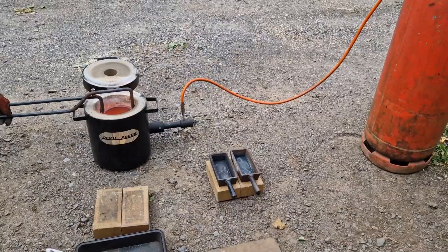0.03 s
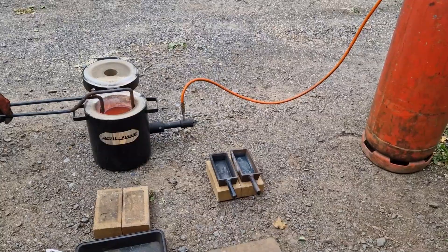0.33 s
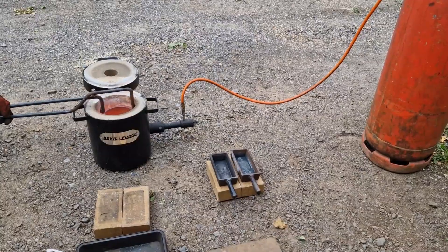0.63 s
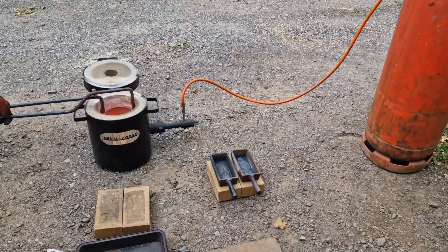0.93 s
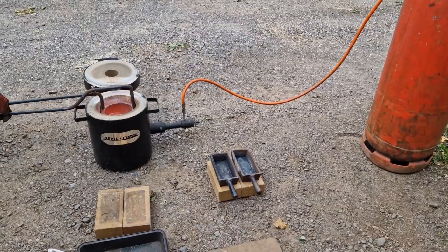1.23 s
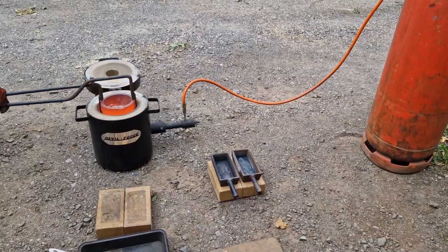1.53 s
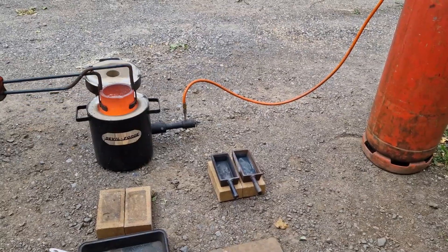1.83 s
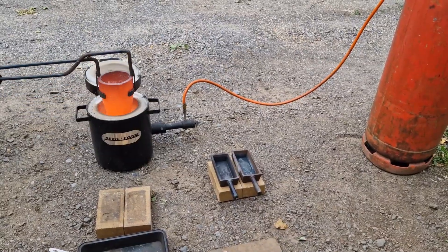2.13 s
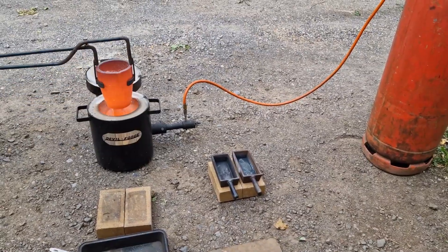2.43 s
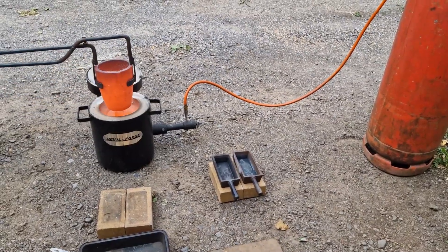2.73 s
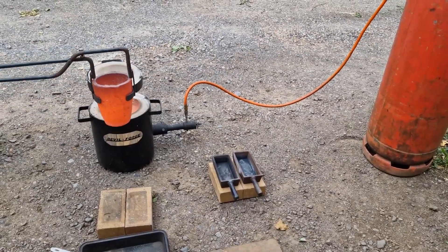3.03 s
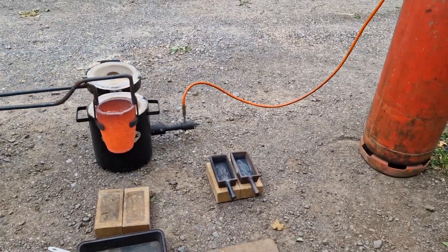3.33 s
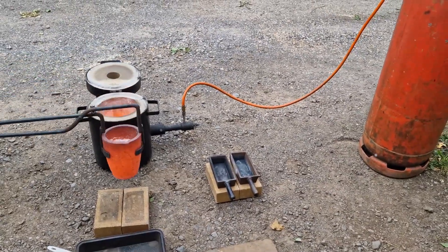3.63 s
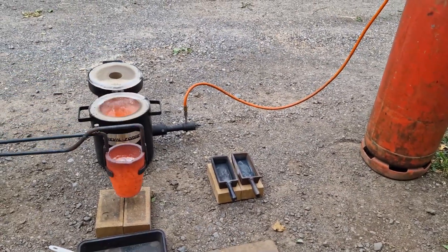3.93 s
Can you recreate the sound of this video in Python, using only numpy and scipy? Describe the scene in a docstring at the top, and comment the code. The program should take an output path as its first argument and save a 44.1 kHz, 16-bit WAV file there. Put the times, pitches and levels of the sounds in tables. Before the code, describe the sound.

A small gas furnace roars low and steady outdoors for all four seconds, with a faint gas hiss slightly to the right. From about 1.3 seconds, as a crucible is lifted through the mouth, the roar dips a little and gains a hollow, breathy resonance, strongest near 1.8 seconds. That resonance edges up in pitch until about 2.5 seconds, then lingers more softly as the roar continues.

```python
"""A low flame roar, with the hiss of a gas jet beside it, comes from a small propane melting furnace.
Turbulent combustion sounds through the furnace mouth, whose resonances change as a glowing crucible,
lifted out with tongs, rises, chokes the mouth and comes clear. The jet's noise rings in the burner tube.
Reflections from the gravel yard interfere, cancelling different pitches at the two microphones."""
import sys
import numpy as np
from scipy import signal
from scipy.fft import rfft, irfft
from scipy.io import wavfile
from scipy.ndimage import uniform_filter1d

SR = 44100
rng = np.random.default_rng(int(sys.argv[2]) if len(sys.argv) > 2 else 0)


def inscribe(sig):
    """Save sig as 16-bit PCM at rate SR to the path in sys.argv[1].

    A 1-D sig is mono; a 2-D sig holds one channel per row.
    Samples are clipped to [-1, 1] before scaling.
    """
    pcm = np.round(np.clip(np.atleast_2d(sig).T, -1, 1) * 32767)
    wavfile.write(sys.argv[1], SR, pcm.astype(np.int16))


N = 176400

# spectral density of the roar before the mouth and yard colour it (f/Hz, level/dB)
ROAR_SPECTRUM = [(20, -71), (36, -74), (54, -53), (72, -55), (116, -44.5), (140, -50.5), (185, -43.5),
                 (232, -45), (272, -39), (305, -42.5), (350, -45), (410, -43.2), (465, -44), (520, -46),
                 (660, -52), (780, -59.5), (890, -69), (1020, -65.5), (1200, -69.5), (1450, -78.5),
                 (1680, -75), (2350, -80), (3000, -81), (3400, -90.5), (3750, -88.5), (4300, -94),
                 (8000, -115)]
# gain of the roar above the bass (t/s, gain/dB)
ROAR_GAIN = [(0, 2.5), (1.33, 0.1), (1.7, -3), (2.2, 0.5), (2.65, 1.7), (3.1, -1), (3.5, -0.35), (4, 0.5)]
# crucible height (t/s, stage: 0 seated, 1 filling the mouth, 2 just over the rim, 3 clear)
CRUCIBLE_LIFT = [(0, 0.18), (1.0, 0.066), (1.28, 0.89), (1.55, 0.87), (2.05, 1.4), (2.35, 1.84), (2.6, 2.0),
                 (2.78, 2.56), (2.95, 2.14), (4, 3.9)]
# resonances at those four stages (f/Hz, width/Hz, gain/dB)
CHAMBER_MODES = [(512, 61, 4), (755, 300, 5.5), (1120, 460, 5), (1456, 140, -13), (1756, 214, 6.5),
                 (3760, 280, 8)]  # space above the seated crucible
RING_GAP_MODES = [(297, 85, 6), (411, 91, 7), (730, 340, -1), (1820, 140, -6.5)]  # gap around it
RIM_SLIT_MODES = [(310, 50, 3), (397, 70, 1.5), (484, 59, -6.5), (585, 130, 2), (3620, 170, 12),
                  (4400, 600, 10.5)]  # slit under it
EMPTY_FURNACE_MODES = [(80, 65, 2), (310, 20, 2), (2000, 160, -4)]
# hollow resonance of the mouth, shifting as the crucible moves (t/s, f/Hz, width/Hz, gain/dB)
MOUTH_RESONANCE = [(0, 2030, 400, 2.5), (.8, 2080, 500, -1), (1.2, 2060, 380, 2.5), (1.4, 2140, 330, 9.5),
                   (1.75, 2180, 240, 14.5), (2.0, 2240, 280, 10), (2.15, 2460, 220, 6), (2.5, 2540, 260, 6),
                   (2.8, 2360, 426, 10), (3.2, 2390, 420, 6), (3.6, 2410, 380, 9.5), (4, 2330, 433, 7.5)]
# the next resonance above it, brief and breathy (t/s, f/Hz, gain/dB)
MOUTH_OVERTONE = [(0, 3000, -1), (1.0, 2870, 0.5), (1.62, 2880, 5), (1.78, 2800, 12), (1.93, 2880, 3),
                  (2.2, 3000, 6), (2.5, 3050, 3.5), (2.68, 3160, 9), (2.95, 3050, 4.5), (3.7, 3160, 5.5),
                  (4, 3120, 2)]
# antiresonance of the mouth, falling as the crucible rises (t/s, f/Hz, gain/dB)
MOUTH_NULL = [(1.0, 1570, 0), (1.3, 1450, -8), (1.5, 1230, -9.5), (1.8, 1110, -8.5), (2.1, 980, -7),
              (2.4, 1000, -1.5)]
# pitches cancelled by reflections at each microphone (f/Hz, width/Hz, gain/dB)
NOTCHES_LEFT = [(229, 18, -4.5), (358.3, 31.5, -40), (465, 46, -10.5), (851, 35, -28)]
NOTCHES_RIGHT = [(231, 40, -6), (457.4, 55, -29), (741.6, 40, -46), (1020, 4.9, -6)]
# phase by which the left microphone leads (f/Hz, phase/rad)
LEFT_PHASE_LEAD = [(100, -1.38), (300, 0.15), (450, -0.05), (650, 0.8), (1200, 1.28), (1500, 1.62),
                   (3000, 2)]
# scattered share of the roar, incoherent between the microphones (f/Hz, share/dB)
SCATTERED_SHARE = [(30, -4), (55, -14), (100, -18), (200, -20.5), (330, -15.5), (470, -14), (900, -7.5),
                   (1150, -8.5), (1700, -4), (4000, -2.5)]
# spectral density of the jet before the burner colours it (f/Hz, level/dB)
JET_SPECTRUM = [(500, -100), (1800, -101), (3000, -90), (4300, -87.5), (5800, -87), (6050, -93.5),
                (6700, -92), (8300, -91), (9800, -94), (12000, -92.5), (15500, -90.5)]
# resonances of the burner tube and nozzle (f/Hz, width/Hz, gain/dB)
BURNER_MODES = [(3560, 110, 2), (5040, 110, 4.5), (5230, 160, -2.5), (5550, 360, 1), (8240, 410, 3.5),
                (10400, 350, 1.5), (11100, 360, 6.5), (13300, 520, 3.8)]
# gain of the hiss below and above its crossover (t/s, low gain/dB, high gain/dB)
JET_GAIN = [(0, 1.5, 0.5), (.5, 0.5, 2), (1.25, 1, 1), (1.7, 2.2, -0.2), (2.0, 3.5, 1.2), (2.45, 3.5, 0.8),
            (2.78, 0, 4), (3.12, -3.5, -0.5), (3.4, 0, -3), (3.7, -1.7, 0.2), (4, 2.5, 4.5)]

BASS_HZ, JET_CROSSOVER_HZ, TOP_HZ = 235, 6000, 15750
OVERTONE_WIDTH_HZ, NULL_WIDTH_HZ = 350, 420
FLUTTER_DB, FLUTTER_HZ = 0.83, 10
JET_WAVER_DB, JET_WAVER_HZ = 1.2, 14
ROAR_PAN_DB, JET_PAN_DB = -0.9, -2.5
ECHO_DECAY_S, ECHO_DRIFT_HZ = 0.011, 0.12  # early echoes from gravel and nearby things
ROAR_ECHO_SHARE, JET_ECHO_SHARE = 0.92, 0.66  # their fraction of the scattered power
WINDOW, HOP = 2048, 256  # samples


def undb(db):
    """Amplitude ratio of a level in decibels."""
    return 10 ** (np.asarray(db) / 20)


def curves(table, t):
    """Linear interpolation in time, one curve for each value column."""
    times, *columns = np.array(table, float).T
    return [np.interp(t, times, column) for column in columns]


def spectrum(table, f):
    """Linear interpolation over log frequency."""
    hz, value = np.array(table, float).T
    return np.interp(np.log(f + 1), np.log(hz), value)


def resonances(table, f):
    """Gain in dB of resonances and antiresonances, each a Gaussian bell."""
    return sum(db * np.exp(-np.log(2) * (2 * (f - hz) / width) ** 2) for hz, width, db in table)


def white_noise(channels):
    """Spectra of independent white noises, each of unit power per hertz."""
    return rfft(rng.standard_normal((channels, N))) * np.sqrt(SR / 2)


def waver(t, f, rate_hz, bands):
    """Slow random modulation, correlated between neighbouring frequencies."""
    steps = rng.standard_normal((bands, len(t)))
    wander = np.array([np.interp(t * rate_hz, np.arange(len(t)), row) for row in steps])
    band_position = np.log(1 + f / f[1]) / np.log(len(f)) * (bands - 1)
    weights = np.maximum(1 - abs(band_position - np.arange(bands)), 0)
    return weights @ wander


def moving_filter(x, gain_db):
    """Time-varying filter: each short-time spectrum is weighted by gain_db(t, f)."""
    framing = dict(nperseg=WINDOW, noverlap=WINDOW - HOP)
    f, t, frames = signal.stft(x, SR, **framing)
    _, filtered = signal.istft(frames * undb(gain_db(t, f[:, None])), SR, **framing)
    return filtered[:, :N]


def pan(x, db):
    """A level difference, left minus right in dB, gives direction."""
    return x * undb(np.array([[db], [-db]]) / 2)


def flame_roar():
    """Turbulent combustion radiates broadband noise from the mouth, heard directly and by scattering."""
    f = np.fft.rfftfreq(N, 1 / SR)
    left_path = interference(NOTCHES_LEFT, f) * np.exp(1j * spectrum(LEFT_PHASE_LEAD, f))
    right_path = interference(NOTCHES_RIGHT, f)
    coherent = white_noise(channels=1) * np.array([left_path, right_path])
    scatter = undb(spectrum(SCATTERED_SHARE, f))
    heard = coherent * np.sqrt(1 - scatter ** 2) + yard_scattering(ROAR_ECHO_SHARE) * scatter
    roar = irfft(heard * undb(spectrum(ROAR_SPECTRUM, f)), N)
    return pan(moving_filter(roar, furnace_mouth), ROAR_PAN_DB)


def furnace_mouth(t, f):
    """Cavity resonance depends on shape: the rising crucible changes the roar's gain in dB."""
    lift, = curves(CRUCIBLE_LIFT, t)
    stages = (CHAMBER_MODES, RING_GAP_MODES, RIM_SLIT_MODES, EMPTY_FURNACE_MODES)
    cavity = sum(np.clip(1 - abs(lift - stage), 0, 1) * resonances(modes, f)
                 for stage, modes in enumerate(stages))
    overtone_hz, overtone_db = curves(MOUTH_OVERTONE, t)
    null_hz, null_db = curves(MOUTH_NULL, t)
    gliding = resonances([curves(MOUTH_RESONANCE, t),
                          (overtone_hz, OVERTONE_WIDTH_HZ, overtone_db),
                          (null_hz, NULL_WIDTH_HZ, null_db)], f)
    roar_db, = curves(ROAR_GAIN, t)
    above_bass = roar_db * f ** 2 / (f ** 2 + BASS_HZ ** 2)
    return cavity + gliding + above_bass + FLUTTER_DB * waver(t, f, FLUTTER_HZ, bands=9)


def interference(table, f):
    """Destructive interference of direct and reflected sound cuts notches in a path's complex response."""
    notches = [1 - (1 - undb(db)) / (1 + 2j * (f - hz) / width) for hz, width, db in table]
    return np.prod(notches, axis=0)


def yard_scattering(echo_share):
    """Multipath propagation: a noise spectrum per microphone, of drifting echoes and a diffuse field."""
    t = np.arange(N) / SR
    ripple = rfft(rng.standard_normal((2, 2, N)) * np.exp(-t / ECHO_DECAY_S))
    ripple /= np.sqrt(uniform_filter1d(abs(ripple) ** 2, size=800, axis=2))  # unit local mean power
    pattern_a, pattern_b = irfft(white_noise(channels=2)[:, None] * ripple, N)
    drift = 2 * np.pi * ECHO_DRIFT_HZ * t
    echoes = rfft(pattern_a * np.cos(drift) + pattern_b * np.sin(drift))
    return echoes * np.sqrt(echo_share) + white_noise(channels=2) * np.sqrt(1 - echo_share)


def gas_jet():
    """Jet noise: propane hisses from the nozzle and excites the burner tube, a little to the right."""
    f = np.fft.rfftfreq(N, 1 / SR)
    level_db = spectrum(JET_SPECTRUM, f) + resonances(BURNER_MODES, f)
    hiss = irfft(yard_scattering(JET_ECHO_SHARE) * undb(level_db), N)
    return pan(moving_filter(hiss, jet_modulation), JET_PAN_DB)


def jet_modulation(t, f):
    """Amplitude modulation in dB: the hiss swells, sinks as the crucible swings forward, and wavers."""
    low_db, high_db = curves(JET_GAIN, t)
    treble = f ** 4 / (f ** 4 + JET_CROSSOVER_HZ ** 4)
    swell = low_db * (1 - treble) + high_db * treble
    return swell + JET_WAVER_DB * waver(t, f, JET_WAVER_HZ, bands=40)


def scene():
    """Superposition: the sound pressures of flame and jet add."""
    return flame_roar() + gas_jet()


def record(dry):
    """Band limiting: a steep elliptic low-pass removes the highest treble."""
    low_pass = signal.ellip(12, rp=0.1, rs=80, Wn=TOP_HZ, fs=SR, output="sos")
    return signal.sosfilt(low_pass, dry)


dry = scene()
out = record(dry)
inscribe(out)
```